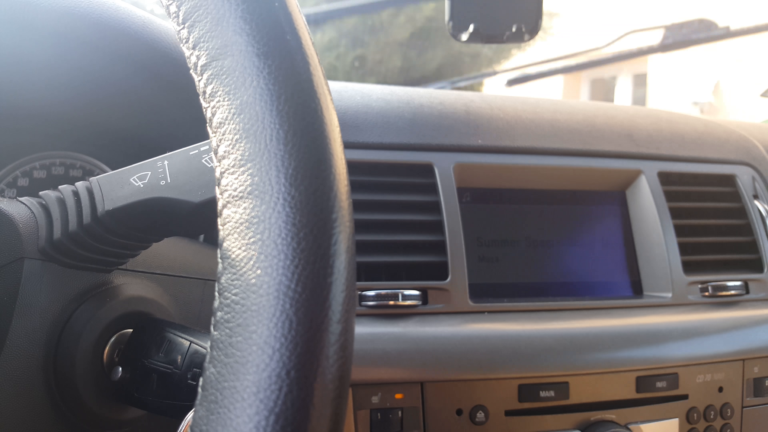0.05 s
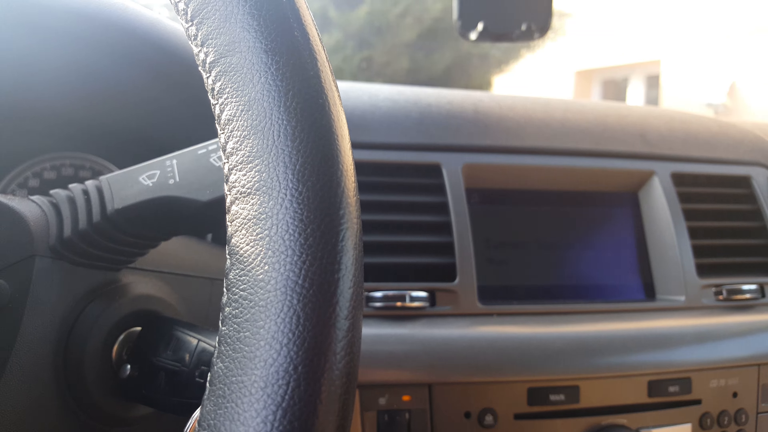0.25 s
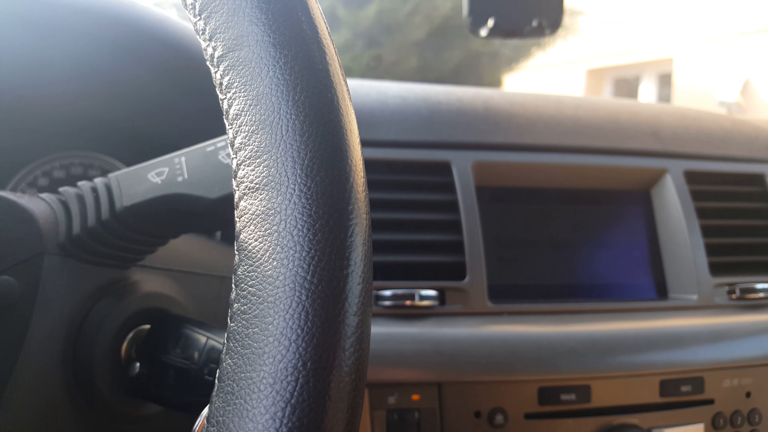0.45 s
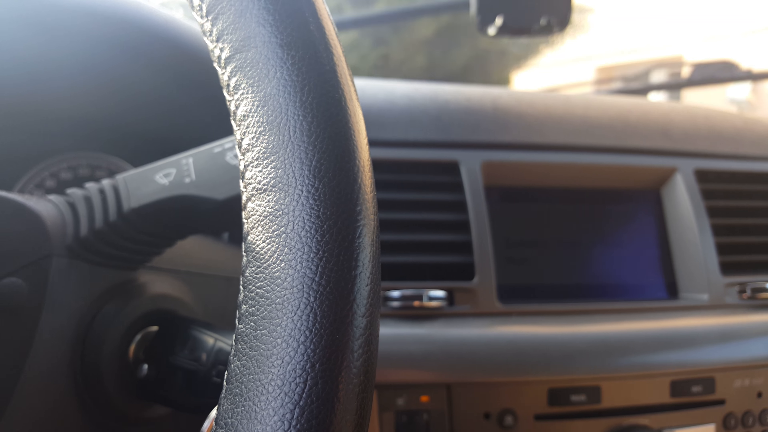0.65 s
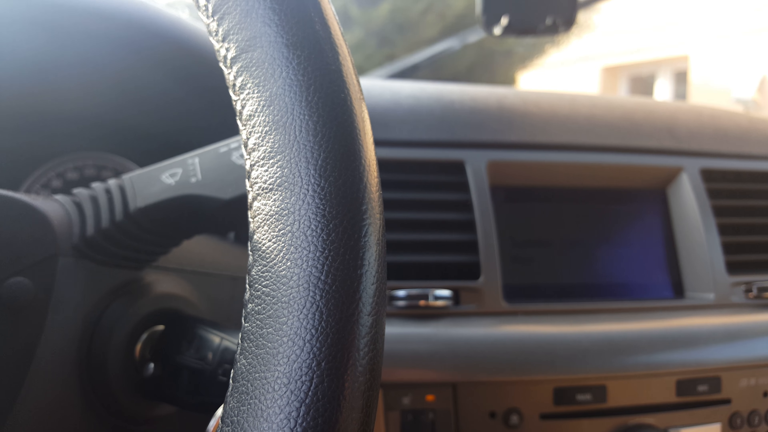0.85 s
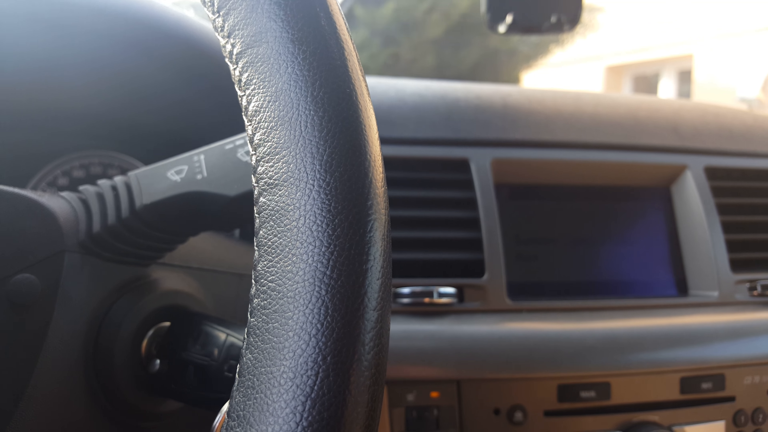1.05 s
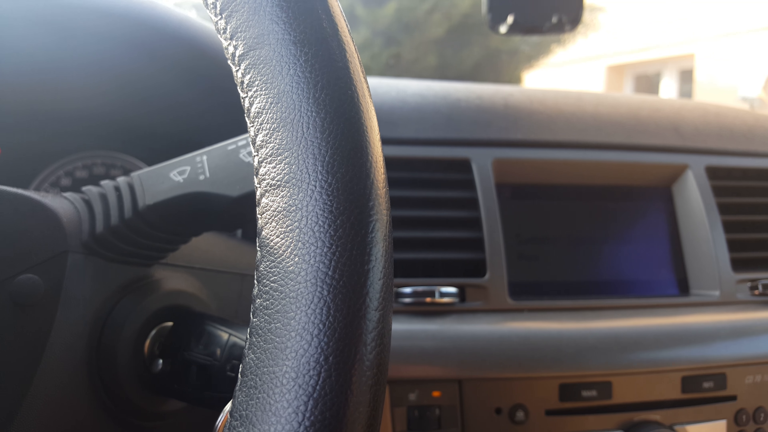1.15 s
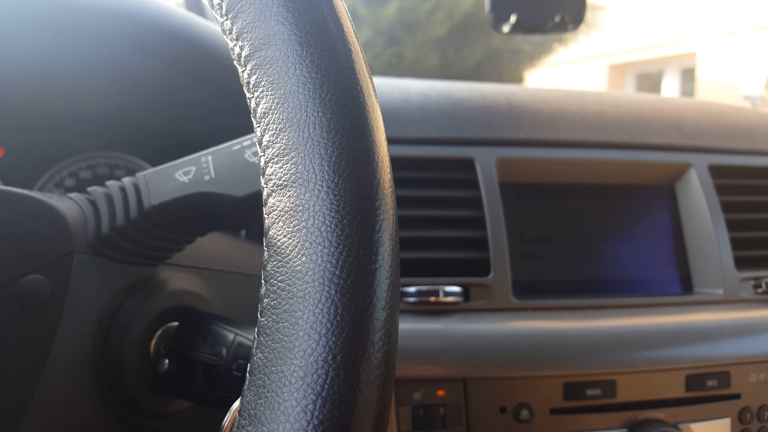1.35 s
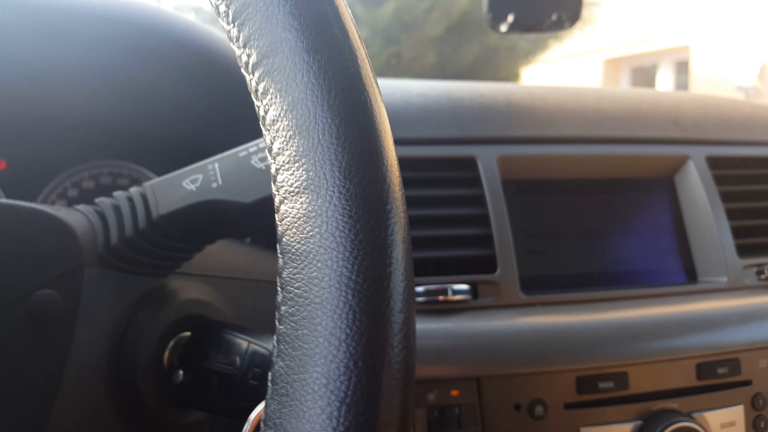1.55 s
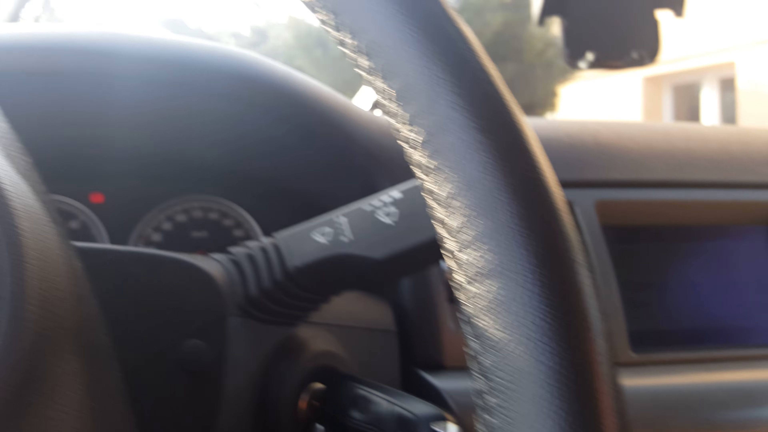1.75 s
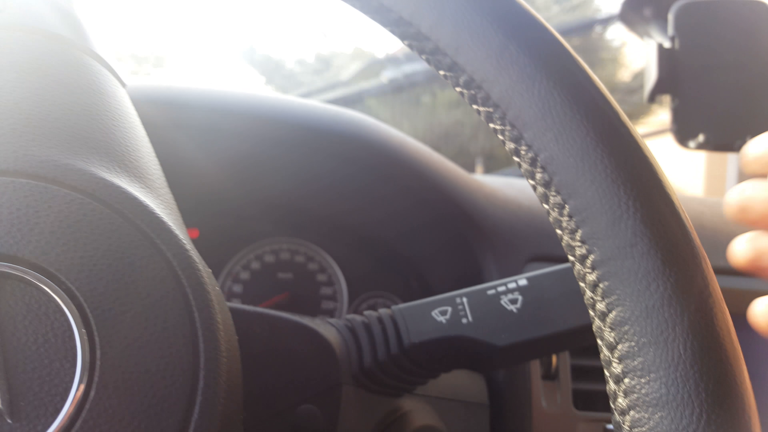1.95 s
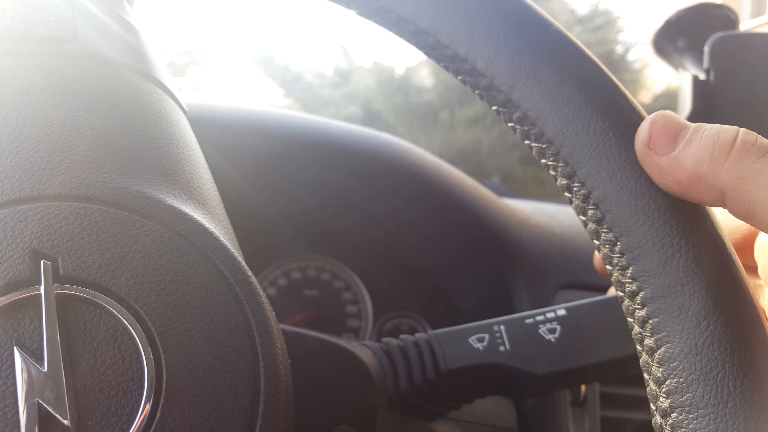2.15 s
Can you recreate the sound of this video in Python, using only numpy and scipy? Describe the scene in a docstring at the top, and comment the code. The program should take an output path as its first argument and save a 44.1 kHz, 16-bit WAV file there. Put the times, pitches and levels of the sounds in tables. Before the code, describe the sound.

Car wipers sweep over a low motor rumble, with sharp pops and a brief handling rustle.

```python
"""Inside a parked car, hand-held stereo camera, wipers sweeping the windscreen over their rumbling drive.
In the first quarter second two sharp pops hit the left microphone, likely a finger on the port.
At 0.5 s the blades flop over, then judder on the way back, and turn again around 1.5 s.
From there a soft hiss swells as the camera swings, probably a sleeve or hand sliding close by,
and at 1.86 s a smaller snap hits the left microphone."""
import sys
import numpy as np
from scipy import signal
from scipy.fft import rfft, irfft
from scipy.io import wavfile

SR = 44100
rng = np.random.default_rng(int(sys.argv[2]) if len(sys.argv) > 2 else 0)


def int16_out(signal):
    """Quantize to a 16-bit WAV file."""
    q = np.round(np.clip(np.atleast_2d(signal).T, -1, 1) * 32767)
    wavfile.write(sys.argv[1], SR, q.astype(np.int16))


N = 97020
T = np.arange(N) / SR
BIN_HZ = np.fft.rfftfreq(N, 1 / SR)
BAND_LIMIT_HZ = 15820


# modes of the glass and scuttle: pitch_hz, level_db, t60_s
GLASS_MODES = [(81.5, -15, .25), (138.2, 1, 0.3), (189.8, 0, 0.2), (242.2, -3, 0.21), (338.2, -3, 0.156),
               (377.3, -9, 0.14), (471, -14, 0.1), (585, -10, .13)]
# dense resonances of the wiper arms: pitch_hz, level_db, t60_s
ARM_MODES = [(40.08, -20, 0.56), (79.5, -6, 0.27), (158, 1.5, 0.18), (330, -4, 0.14), (607, -6, 0.095),
             (1210, -16.5, 0.13), (2520, -23.5, 0.13), (3500, -32.5, .1), (5014, -38, 0.086)]
def blade_flop(level_db, tilt_db, ring_factor, rise_s, count=160):
    """A blade flops over: the glass rings and the arm clatters, the treble dying first."""
    t = np.arange(SR // 2) / SR
    def decay(hz, t60_s):
        return amp(tilt_db * np.log2(hz / 250) - 60 * t / (ring_factor * t60_s))
    hz = np.geomspace(ARM_MODES[0][0], ARM_MODES[-1][0], count)[:, None]
    phase = 2 * np.pi * (hz * t + rng.random((count, 1)))
    skew = rng.standard_normal((count, 1)) * hz / 900  # the microphones differ more in the treble
    weights = amp(at_hz(ARM_MODES, hz))
    envelopes = weights / np.linalg.norm(weights) * decay(hz, at_hz(ARM_MODES, hz, column=2))
    clatter = np.array([(envelopes * np.sin(phase + side * skew)).sum(0) for side in (1, -1)])
    glass = sum((-1) ** k * amp(db) * decay(f, t60_s) * np.sin(2 * np.pi * f * t)
                for k, (f, db, t60_s) in enumerate(GLASS_MODES))
    return amp(level_db) * np.minimum(t / rise_s, 1) * (2 * amp(-3.5) * clatter + amp(-6.5) * glass)


# blows at the turns: start_s, level_db, tilt_db_per_octave, ring_factor, rise_s, bass_cut_hz
BLADE_BLOWS = [(.414, -35.5, 2.5, 0.93, 0.0059, 174), (.492, -36, 2.5, 1.15, 0.002, 90),
               (.52, -30.5, -1, 1, .006, 59.6), (.565, -37.5, -7, 0.89, .005, 69),
               (1.344, -39.5, -2.5, 1.27, 0.006, 115), (1.399, -33.5, -1, 1.1, 0.0034, 90),
               (1.441, -39, -6, 1, .003, 90), (1.493, -31, 0, 1.1, .008, 110),
               (1.511, -27.5, -2, 1.05, 0.005, 55), (1.533, -34, -5, .9, .004, 90)]
def blade_turns():
    """Each turn lands as a cluster of blows, heard from inside the windscreen."""
    out = np.zeros((2, N))
    for start_s, *blow, bass_cut_hz in BLADE_BLOWS:
        bass_cut = signal.butter(2, bass_cut_hz, "high", fs=SR)
        add(out, start_s, signal.lfilter(*bass_cut, blade_flop(*blow)))
    return out


# rubber chattering across the glass: time_s, pitch_hz, level_db
BLADE_JUDDER = [(.51, 92, -58), (.55, 86.4, -32), (.62, 80.7, -41), (.72, 83, -43), (.88, 81.5, -46.5),
                (.97, 81.8, -62), (1.15, 84.75, -50.5), (1.35, 85.26, -60)]
def judder():
    """The rubber skips on the return stroke, making a low, unsteady tone."""
    pitch_hz = at_time(BLADE_JUDDER) * (1 + 0.0094 * wander(11))
    level = amp(at_time(BLADE_JUDDER, column=2) + 0.41 * wander(25))
    return np.sqrt(2) * level * np.sin(2 * np.pi * np.cumsum(pitch_hz) / SR)


# low gliding tones of the wipers, centred: start_s, length_s, start_hz, end_hz, level_db
WIPER_GLIDES = [(.085, 0.066, 374, 365, -56.5), (.1, 0.028, 521, 510, -55.5), (.26, 0.18, 358, 347, -57.5),
                (.405, 0.055, 170, 205, -43), (.418, 0.025, 419, 470, -46.5), (.424, .032, 600, 565, -51),
                (.488, 0.039, 498, 415, -43), (.475, 0.077, 132.4, 162, -34.5),
                (.518, 0.045, 355, 310, -39), (.555, 0.08, 151.2, 130.6, -42),
                (1.035, 0.085, 252, 228, -40.5), (1.17, 0.091, 181.5, 201, -44),
                (1.338, 0.11, 240, 234, -39), (1.338, 0.088, 372.8, 333, -45),
                (1.498, .075, 235, 200, -30.5), (1.59, 0.055, 140, 115, -41)]
def wiper_glides(waver=0.045, shimmer_db=2, octave_db=-24):
    """Short, wavering tones; the loudest is the falling boom of the blade thump at 1.5 s."""
    out = np.zeros((2, N))
    for start_s, length_s, start_hz, end_hz, level_db in WIPER_GLIDES:
        size = round(length_s * SR)
        pitch_hz = np.linspace(start_hz, end_hz, size) * (1 + waver * wander(60)[:size])
        phase = 2 * np.pi * np.cumsum(pitch_hz) / SR
        level = signal.windows.tukey(size, 0.5) * amp(level_db + shimmer_db * wander(50)[:size])
        add(out, start_s, level * (np.sin(phase) + amp(octave_db) * np.sin(2 * phase)))
    return out


# wiper drive, heard from the cabin: time_s, level_db
DRIVE_LEVEL = [(0, -46.5), (.08, -60.5), (.16, -51.5), (.33, -51.5), (.6, -46), (.8, -48), (.98, -50),
               (1.1, -44.5), (1.22, -48), (1.33, -48), (1.44, -39), (1.61, -47), (1.78, -50.5), (1.92, -55),
               (2.11, -50), (2.2, -55)]
# its spectrum: frequency_hz, level_db
DRIVE_SPECTRUM = [(20, -27), (48, 0.5), (70, -9), (110, -1), (190, 2.5), (245, -4.5), (310, -13.5),
                  (360, -14.5), (600, -30), (1200, -40), (16000, -77)]
def drive():
    """The drive's low rumble rises and falls through the sweep."""
    return amp(at_time(DRIVE_LEVEL)) * noise(DRIVE_SPECTRUM)


# pressure steps right at the left microphone: start_s, height, rise_s
PORT_STEPS = [(.0406, .052, .000035), (.21508, .23, .00004), (.21543, 1.05, .000042),
              (.24697, 1.14, .00006)]
def port_pops(port_hz=101, snap_s=1.85785, snap_rise_s=0.000068, snap_edge_hz=1235):
    """Sudden pressure steps relax through the left port's bass cut; the last is a thin snap."""
    steps = sum(height * (1 - np.exp(-np.maximum(T - start_s, 0) / rise_s)) ** 2
                for start_s, height, rise_s in PORT_STEPS)
    snap = (1 + np.tanh((T - snap_s) / snap_rise_s)) / 2
    steep_cut = signal.butter(20, snap_edge_hz, "high", fs=SR, output="sos")
    thin_snap = signal.sosfiltfilt(steep_cut, snap, padtype=None)
    pops = signal.lfilter(*signal.butter(2, port_hz, "high", fs=SR), steps + 0.099 * snap)
    return np.array([pops + 0.77 * thin_snap, np.zeros(N)])


# dull and bright friction close to the camera: time_s, level_db
DULL_LEVEL = [(0, -53.5), (.035, -53.5), (.1, -66.5), (.2, -80), (.3, -95), (1.56, -63.5), (1.615, -54.5),
              (1.675, -47), (1.84, -47.5), (1.88, -53.5), (2.05, -54.5), (2.2, -56.5)]
BRIGHT_LEVEL = [(0, -62), (.04, -64.5), (.08, -69.5), (.2, -72.5), (.3, -88), (1.3, -91), (1.41, -69),
                (1.58, -72), (1.608, -53), (1.64, -59), (1.71, -49), (1.8, -49), (1.9, -51.5), (2.03, -51),
                (2.11, -56.5), (2.2, -59)]
# place of the bright part: time_s, left_over_right_db
BRIGHT_PAN = [(1.4, 1), (1.6, -5), (1.71, 0.5), (1.82, -1), (2.05, -4), (2.2, -2.5)]
# treble surges close to the ports: peak_s, width_s, level_db, left_over_right_db
PORT_SURGES = [(.03, .045, -63, 6), (1.615, .012, -58, -3), (1.735, 0.077, -53.5, 10)]
# spectra of the three: frequency_hz, level_db
DULL_SPECTRUM = [(20, -34), (120, -18), (300, 0), (500, 5), (850, -0.5), (1300, 0), (1700, -0.5),
                 (2200, -2.5), (3000, -4.5), (4200, -13), (7000, -26), (16000, -28)]
BRIGHT_SPECTRUM = [(20, -30), (1500, -25), (3200, -1.5), (4500, 1), (6800, 2), (8700, 5.5), (9600, 0.5),
                   (10400, -4.5), (12000, 1.5), (13800, 3), (16000, -0.5)]
PORT_SPECTRUM = [(20, -46), (8000, -25), (11000, -15), (13000, 2.5), (16000, -2)]
def sliding():
    """A sleeve or hand slides by: grainy hiss, brief at the start, longer near the end."""
    dull = amp(at_time(DULL_LEVEL) + 0.45 * wander(66)) * noise(DULL_SPECTRUM, grain_db=2.5)
    bright = amp(at_time(BRIGHT_LEVEL) + 0.5 * wander(60)) * noise(BRIGHT_SPECTRUM, grain_db=1.5)
    surges = sum(amp(level_db) * pan(pan_db) * np.exp(-((T - peak_s) / width_s) ** 2)
                 for peak_s, width_s, level_db, pan_db in PORT_SURGES)
    return dull * pan(1.2) + bright * pan(at_time(BRIGHT_PAN)) + surges * noise(PORT_SPECTRUM)


# buffeting at the microphones: time_s, level_db
BUFFET_LEVEL = [(0, -58), (1.45, -66), (1.53, -43), (1.59, -55), (1.655, -43), (1.745, -57), (1.81, -49.5),
                (1.9, -61), (2.2, -86)]
# its spectrum: frequency_hz, level_db
BUFFET_SPECTRUM = [(20, -8), (38, -1.5), (50, -15), (75, -6), (200, -46), (16000, -100)]
def buffeting():
    """The swinging camera makes low gusts of noise."""
    return amp(at_time(BUFFET_LEVEL)) * noise(BUFFET_SPECTRUM)


# rubber and cloth, off to the right: start_s, length_s, centre_hz, level_db
SHORT_CHAFES = [(0.263, 0.03, 2860, -65.5), (0.376, 0.039, 2900, -63), (1.59, 0.042, 2850, -54),
                (1.619, 0.016, 3300, -55.5), (1.985, .08, 8500, -60)]
def chafes(width_hz=780, pan_db=-10.5):
    """Brief friction in one narrow resonance."""
    out = np.zeros((2, N))
    for start_s, length_s, centre_hz, level_db in SHORT_CHAFES:
        peak = signal.iirpeak(centre_hz, centre_hz / width_hz, fs=SR)
        friction = rng.standard_normal((2, SR // 8))
        rub = unit_rms(signal.lfilter(*peak, signal.lfilter(*peak, friction)))
        window = np.sqrt(np.hanning(round(length_s * SR)))
        add(out, start_s, amp(level_db) * pan(pan_db) * window * rub[:, :len(window)])
    return out


# faint clicks of handling and wiper arms: start_s, level_db, left_over_right_db, low_edge_hz
FAINT_CLICKS = [(0.0145, -42, 3, 11000), (0.523, -46, -2, 1500), (1.402, -43, 9, 12000),
                (1.446, -45, 7, 1900)]
def clicks(decay_s=0.0011):
    """Tiny dry clicks, each a burst of band-limited noise."""
    out = np.zeros((2, N))
    t = np.arange(SR // 50) / SR
    for start_s, level_db, pan_db, low_hz in FAINT_CLICKS:
        burst = rng.standard_normal((2, len(t))) * np.exp(-t / decay_s)
        band = signal.butter(2, [low_hz, min(low_hz * 3, BAND_LIMIT_HZ)], "band", fs=SR)
        add(out, start_s, amp(level_db) * pan(pan_db) * signal.lfilter(*band, burst))
    return out


def skin_crackle(ticks_per_s=90, level_db=-77.5, spread_db=3.6, decay_s=0.0011):
    """Skin on the camera case makes sparse, very high ticks, nearer the left microphone."""
    sizes = amp(spread_db * np.minimum(rng.exponential(1, N), np.pi))
    impulses = sizes * (rng.random(N) < ticks_per_s / SR)
    envelope = signal.lfilter([1], [1, -np.exp(-1 / (decay_s * SR))], impulses)
    return amp(level_db) * pan(6) * unit_rms(envelope * noise(PORT_SPECTRUM))


# background in the cabin: frequency_hz, level_db
ROOM_SPECTRUM = [(20, 2), (400, 1.5), (700, 2.5), (1500, -0.5), (2600, -2.5), (4500, -9.5), (6500, -12),
                 (8300, -9.5), (10300, -18.5), (12000, -14), (14200, -6), (16000, -15)]
def room_tone(level_db=-64):
    """A faint, steady hiss under everything."""
    return amp(level_db) * noise(ROOM_SPECTRUM)


# likeness of the two microphones: frequency_hz, correlation
MIC_CORRELATION = [(20, 0.72), (150, 0.93), (300, 0.79), (600, 0.43), (1200, 0), (16000, 0)]
def noise(spectrum, grain_db=0):
    """Coloured stereo noise of rms 1, near mono in the bass; grain_db makes it gritty."""
    white = rng.standard_normal((2, N))
    grain = amp(grain_db * np.array([wander(1040), wander(670)]))
    left, independent = rfft(white * grain)
    likeness = at_hz(MIC_CORRELATION, BIN_HZ)
    right = likeness * left + np.sqrt(1 - likeness ** 2) * independent
    return unit_rms(irfft(np.array([left, right]) * amp(at_hz(spectrum, BIN_HZ)), N))


def wander(rate_hz):
    """Slow random drift of rms 1."""
    return unit_rms(irfft(rfft(rng.standard_normal(N)) / (1 + (BIN_HZ / rate_hz) ** 4), N))


def amp(db):
    """Decibels to gain."""
    return 10 ** (np.asarray(db) / 20)


def unit_rms(x):
    """Scales to rms 1."""
    return x / np.sqrt(np.mean(x ** 2) + 1e-20)


def at_hz(table, hz, column=1):
    """Reads a column on a log-frequency axis."""
    cols = np.transpose(table)
    return np.interp(np.log(hz + 1), np.log(cols[0] + 1), cols[column])


def at_time(table, column=1):
    """Reads a column at every sample."""
    cols = np.transpose(table)
    return np.interp(T, cols[0], cols[column])


def pan(db):
    """Left and right gains; positive is left."""
    return amp(np.vstack([db, -db]) / 2)


def add(mix, start_s, sound):
    """Mixes a sound in at a time."""
    part = mix[:, round(start_s * SR):][:, :sound.shape[-1]]
    part += sound[..., :part.shape[1]]


# balance between the microphones: frequency_hz, left_over_right_db
MIC_BALANCE = [(20, -0.5), (200, 1.5), (400, -1), (1300, 0.5), (2400, -1), (4400, -1), (8000, 1.5),
               (15000, 3)]
def scene():
    """The cabin as the two microphones hear it, plus the pops on the left one."""
    wipers = judder() + wiper_glides() + drive() + blade_turns()
    cabin = wipers + chafes() + sliding() + buffeting() + clicks() + skin_crackle() + room_tone()
    return irfft(rfft(cabin) * pan(at_hz(MIC_BALANCE, BIN_HZ)), N) + port_pops()


def record(dry):
    """The camera clips at full scale, then limits the band."""
    low_pass = signal.firwin(511, BAND_LIMIT_HZ, window=("kaiser", 9), fs=SR)
    return signal.oaconvolve(np.clip(dry, -1, 1), low_pass[None], "same")


dry = scene()
out = record(dry)
int16_out(out)
```